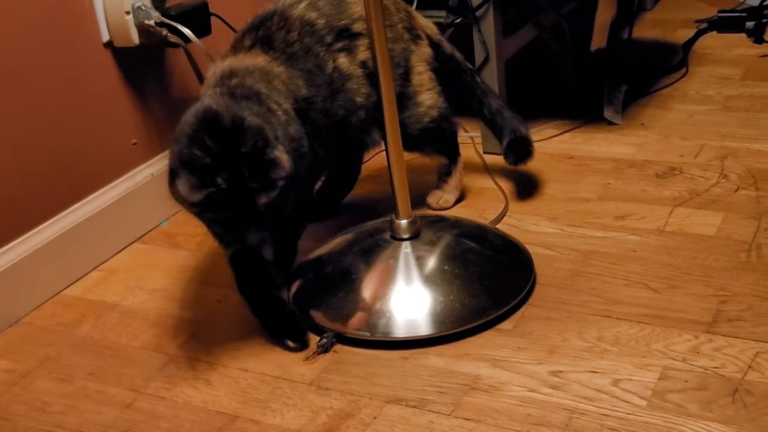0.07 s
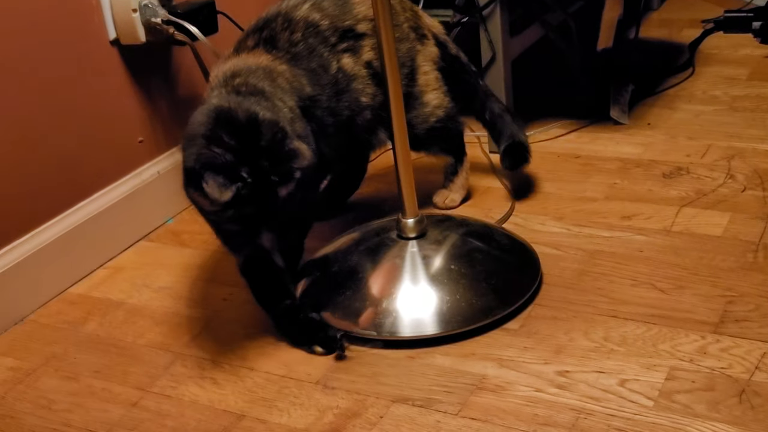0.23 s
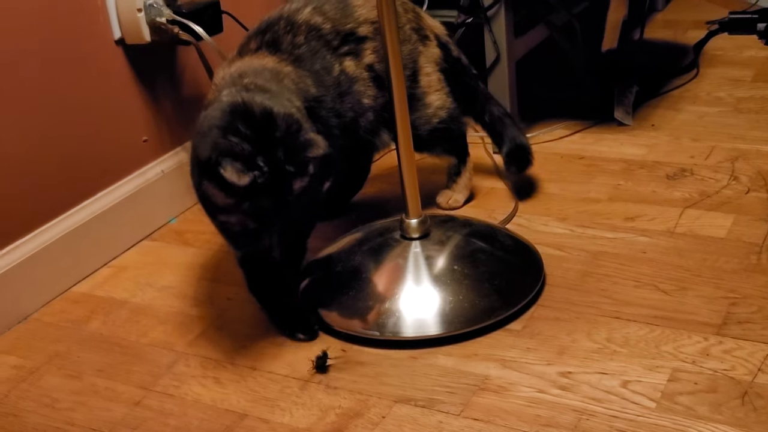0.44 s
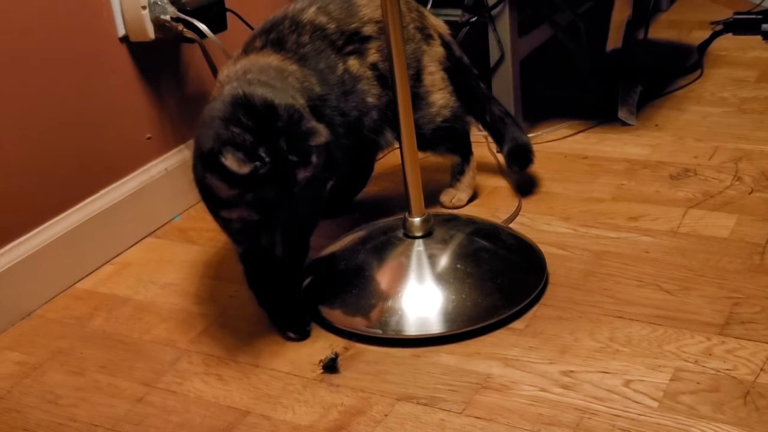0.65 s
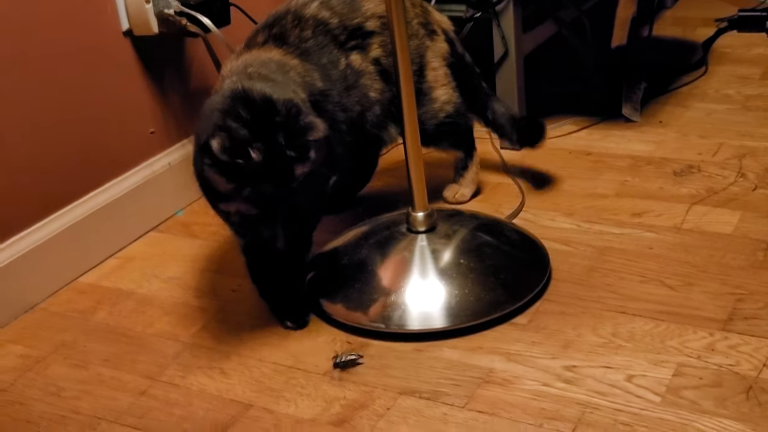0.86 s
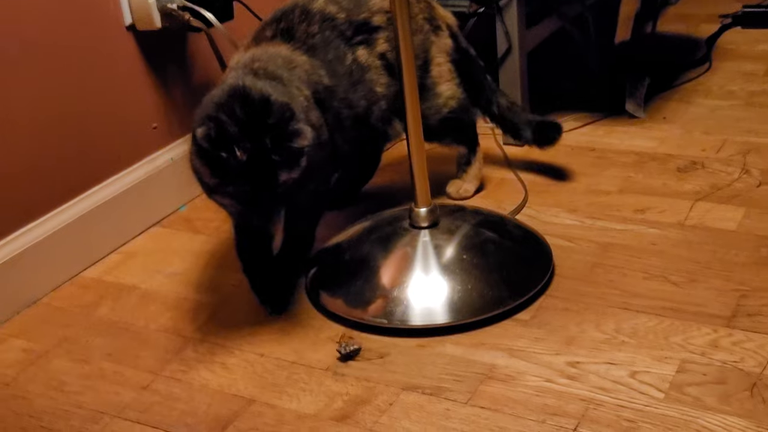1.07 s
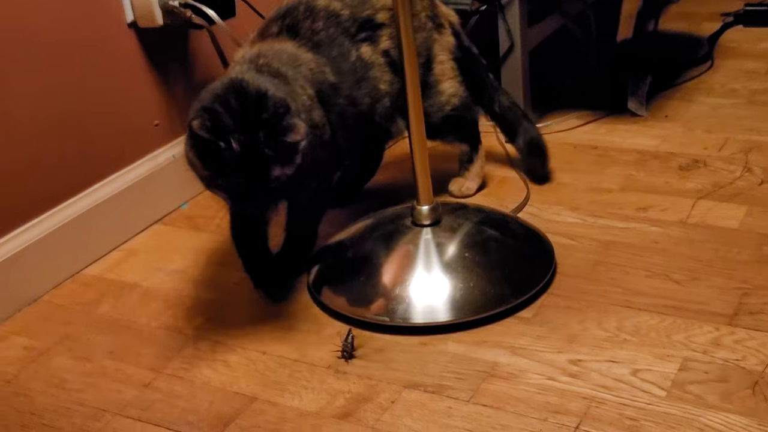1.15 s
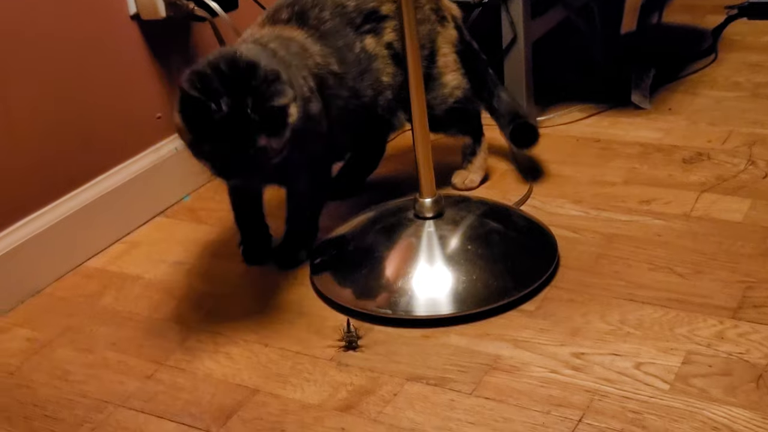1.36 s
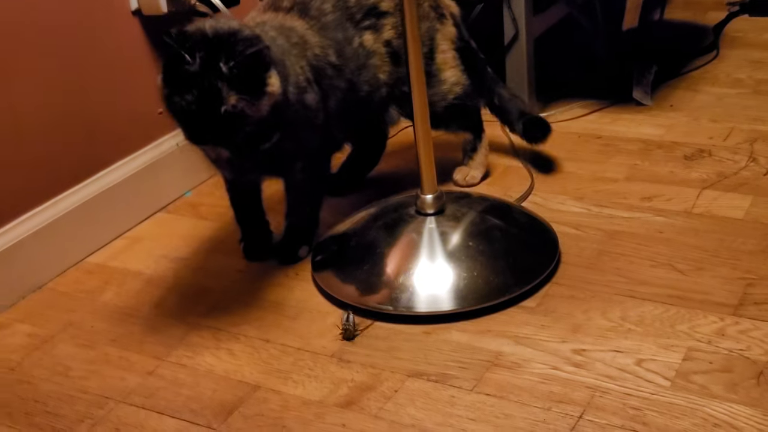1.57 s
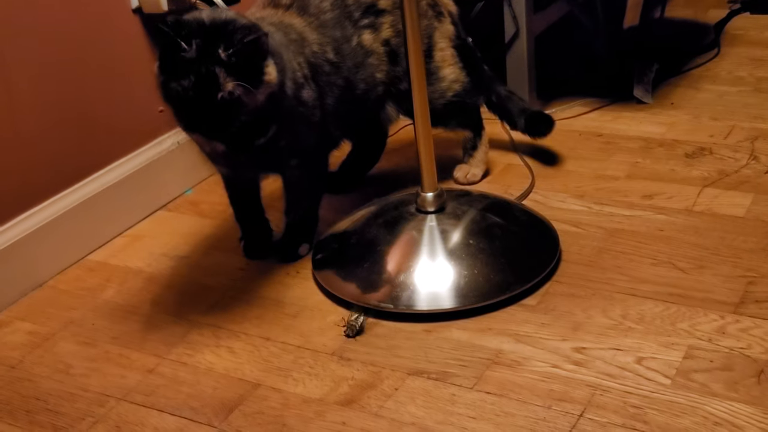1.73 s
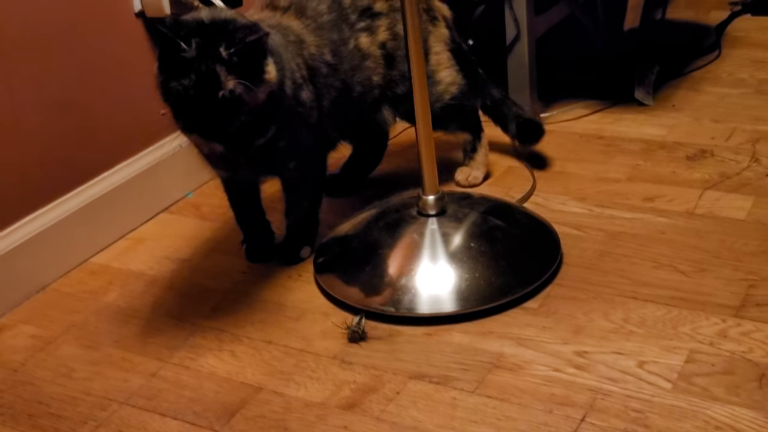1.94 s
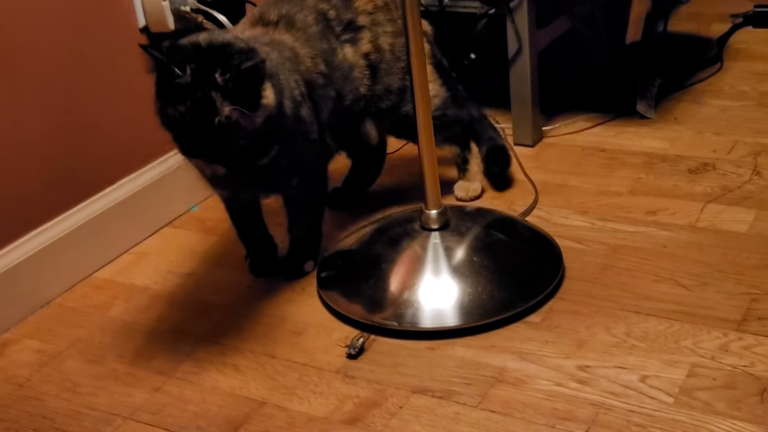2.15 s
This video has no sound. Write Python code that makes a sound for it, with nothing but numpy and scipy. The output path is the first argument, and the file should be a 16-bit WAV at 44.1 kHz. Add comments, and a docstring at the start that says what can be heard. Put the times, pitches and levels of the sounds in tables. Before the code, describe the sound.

A large insect's wings flutter in dry, crackling, clicking bursts against a wooden floor.

```python
"""In a quiet room, a cicada flounders on the wooden floor beside a metal lamp base, about a metre away.
Its stiff wings crinkle as tiny creases click, and they snap against the floor and bounce back.
A few knocks make the lamp base ring, and soft taps sound in the boards.
The room echoes briefly over a low rumble, mains hum and two dull thuds in the floor."""
import sys
import numpy as np
from scipy import signal
from scipy.fft import rfft, irfft
from scipy.io import wavfile
from scipy.ndimage import uniform_filter1d

SR = 44100
rng = np.random.default_rng(int(sys.argv[2]) if len(sys.argv) > 2 else 0)


def log_audio(samples):
    """Write samples as a 16-bit WAV file to the path given in sys.argv[1]."""
    # one column per channel
    frames = np.atleast_2d(samples).T
    # limit to full scale, then quantise
    limited = np.clip(frames, -1, 1)
    pcm = np.round(limited * 32767).astype(np.int16)
    wavfile.write(sys.argv[1], SR, pcm)


N = 97020


def undb(db):
    """Turn decibels into a gain to multiply by."""
    return 10 ** (np.asarray(db) / 20)


def unit(x):
    """Scale to an average power of 1."""
    return x / np.sqrt(np.mean(x ** 2) + 1e-20)


def curve(points, f):
    """Join (frequency, value) points into a line, with octaves evenly spaced."""
    p = np.array(points, float)
    return np.interp(np.log(f + 1), np.log(p[:, 0]), p[:, 1])


def freqs(size):
    """The frequencies in the spectrum of this many samples."""
    return np.arange(size // 2 + 1) * SR / size


def bump(f, hz, width_hz):
    """A rounded peak of height 1 around one frequency."""
    return 1 / (1 + (2 * (f - hz) / width_hz) ** 2)


def causal(gain):
    """A filter with these gains that rings only after a sound, never before it."""
    cepstrum = irfft(np.log(gain + 1e-5))
    half = len(cepstrum) // 2
    cepstrum[1:half] *= 2
    cepstrum[half + 1:] = 0
    return np.exp(rfft(cepstrum))


def add(out, start, x):
    """Mix x into out at a start time in seconds."""
    i = max(int(start * SR), 0)
    part = out[..., i:i + x.shape[-1]]
    part += x[..., :part.shape[-1]]


def swells(rows, taper):
    """A loudness outline that rises and falls once per row; taper is the share spent fading."""
    outline = np.zeros(N)
    for start, length, db in rows:
        add(outline, start, undb(db) * signal.windows.tukey(int(length * SR), taper))
    return outline


def noise_pair(size, unlike=.35):
    """Two partly alike noises, left and right."""
    shared, side = rng.standard_normal((2, size))
    return np.array([shared + unlike * side, shared - unlike * side])


def pan(db):
    """Left and right gains, with the left db decibels above the right."""
    return unit(undb(np.array([[db], [-db]]) / 2))


def background():
    """The room rumbles and hisses, the mains hum, and a faint swish fades at the start."""
    # colour of the room's steady noise: f/Hz, relative level/dB
    tone_colour = [(15, -13), (25, -9.5), (70, -1), (229, -4), (591, -14), (775, -11.5), (863, -20),
                   (1400, -20), (2160, -28.5), (2350, -28.5), (3430, -26.5), (4370, -29.5), (4740, -27),
                   (5140, -29.5), (16000, -50.5)]
    # tones of the mains hum: f/Hz, level/dB
    hum_tones = [(59.6,-71),(119.8,-67.5),(239.7,-71.5),(359.5,-72),(420,-69.5)]
    t, f = np.arange(N) / SR, freqs(N)
    mid, side, hiss = rfft(rng.standard_normal((3, N)))
    width = np.clip(f / 500, .3, 1)  # left and right are more alike below 500 Hz
    stereo = mid + np.array([[1], [-1]]) * width * side
    tone = unit(irfft(stereo * undb(curve(tone_colour, f))))
    hum = sum(undb(db) * np.sqrt(2) * np.sin(2 * np.pi * (hz * t + rng.random())) for hz, db in hum_tones)
    swish = unit(irfft(hiss * bump(f, hz=1520, width_hz=560)))
    swish *= np.clip((.22 - t) / .085, 0, 1)  # gone by 0.22 s
    return (undb(-54) * tone + hum + undb(-62) * swish) * pan(-1.06)


def floor_thuds():
    """Dull swells of rumble in the floor, probably a cat shifting its weight."""
    # thuds: t/s, level/dB, length/s
    thuds = [(.0,-57.5,0.14),(0.269,-52,0.063)]
    rumble = unit(irfft(rfft(rng.standard_normal(N)) * bump(freqs(N), hz=59, width_hz=45)))
    return rumble * swells([(start, length, db) for start, db, length in thuds], taper=.5)


def wing_crinkle(beat_hz=127.1, clicks_per_s=3000):
    """Tiny creases in the thin wing click in dense spells, bunched by the uneven wingbeat."""
    # spells of crinkling: t/s, length/s, relative level/dB
    spells = [(0.145,0.036,-54),(0.175,0.092,-36.5),(0.283,0.046,-37),(0.31,0.11,-40),(0.481,0.05,-48),(0.596,0.025,-31),(0.731,0.037,-41),(0.851,0.1,-40),(1.008,0.011,-46),(1.138,0.01,-33.5),(1.242,0.081,-36),(1.294,0.058,-36.5),(1.476,0.056,-49.5),(1.523,0.026,-42.5),(1.544,0.063,-33.5),(1.683,.015,-51),(1.7,0.074,-52),(1.768,0.047,-44),(1.85,0.14,-47.5),(2.002,0.051,-49),(2.105,0.05,-53.5)]
    # colour of the crinkle: f/Hz, relative level/dB
    colour = [(300,-86),(900,-7),(1500,-9.5),(2600,-3.5),(4000,-10.5),(6500,0),(8500,-16.5),(11000,0),(14000,5),(16000,-2)]
    wander = unit(uniform_filter1d(rng.standard_normal(N), size=900))
    cycles = np.cumsum(beat_hz * (1 + .175 * wander)) / SR
    beat = 1 + .1 * np.sin(2 * np.pi * cycles)
    click_db = 3 * np.minimum(rng.exponential(size=N), 3)
    clicks = (rng.random(N) < clicks_per_s / SR) * undb(click_db)
    spectrum = rfft(noise_pair(N) * clicks * beat) * causal(undb(curve(colour, freqs(N))))
    return unit(irfft(spectrum)) * swells(spells, taper=.7) * undb(-2.5) * pan(-2.5)


def wing_strikes(size=2048, bend=.053):
    """The wing hits the floor and rings. Returns the direct sound and a smoother one to fill the room."""
    # wing hits: t/s, relative treble level/dB, middle over treble/dB, bass over treble before a lift/dB,
    # left minus right/dB, bounce delay/s, bounce over snap/dB
    hits = [(0.2031, -27, -1, -16.5, -7.5, 0.0024, -8), (0.2226, -34, -9.0, -16, 7, 0.0039, -10),
            (0.2277, -28.5, -6.5, -10, -7, 0.0016, 5.5), (0.2633, -38.5, -1, -15.0, -4, 0.0011, -2),
            (0.2697, -39.5, -2, -7.5, -9, 0.0015, -2.0), (0.3095, -29.0, -4.5, -6.5, -5, 0.0024, -14),
            (0.3121, -34, -7, -9.5, -16, 0.0029, -4.0), (0.3355, -25, 0.5, -7.5, -5.5, 0.0021, -4.5),
            (0.3638, -39.5, -1, -1, -6, 0.0011, -8), (0.3921, -41, -11, -19, 9, 0.0013, -9),
            (0.4045, -34, -12, -11.5, 8, 0.0019, 0), (0.4067, -27, -9.0, -10.5, -14, 0.0013, 0),
            (0.499, -50.5, 5.5, -15, -19, 0.004, -13), (0.5063, -38, -3, -8.0, -7.5, 0.0011, -5),
            (0.5919, -43, -3.5, -9, -3, 0.00085, -1.0), (0.6057, -24, -10, -12, -2, 0.0015, 11),
            (0.7234, -38.0, -0.5, -12.5, -4, 0.0014, -2), (0.8033, -51, -7, -13.0, -10, 0.00096, -1),
            (0.8737, -27.5, -9.5, -18.5, -2.5, 0.0034, -1.5), (0.9118, -34, -0.5, -11.5, -5, 0.0024, 0),
            (0.9583, -31.5, -5, -10, -5, 0.00053, -17), (1.0008, -41.5, -0.5, -4.5, -2.0, 0.00077, -3),
            (1.0152, -41.5, 1, -7.5, -2, 0.0016, -15), (1.1109, -36.5, -8, -12.5, -8, 0.0011, -11),
            (1.148, -21, -9.5, -17.5, -3.5, 0.0035, -3.5), (1.2605, -28.0, -8.0, -12.5, -8, 0.004, -19),
            (1.2894, -20.5, -9.5, -19.5, -3.0, 0.0019, 2.5), (1.4992, -47, -23, -25, 1, 0.0014, -6),
            (1.5441, -34.5, -7.0, -16, -5, 0.002, 3), (1.5606, -45.5, 1, -6, 11, 0.00091, 6),
            (1.5679, -39.5, 4.5, -7.5, -6.5, 0.0014, -3), (1.5752, -34, -7, -12.5, 1.5, 0.0012, 5),
            (1.5906, -36.5, -13.0, -22.0, -1, 0.0017, -3), (1.7849, -33.5, -5.5, -15, -6.0, 0.0015, 0.5),
            (1.7895, -37, -7, -22.0, -3.0, 0.00045, -3), (1.823, -40.5, -6.0, -10, -5, 0.0011, -3),
            (1.8656, -41.0, -9.0, -15, -5.5, 0.0027, 3), (1.8851, -45, -13.0, -10, -11, 0.0014, 5),
            (1.898, -46, -6, -18.0, -7, 0.0015, -3), (1.918, -50, -14, -10, -6.0, 0.0022, -4.0),
            (1.9333, -54, 1, -17, 1, 0.00058, -8), (1.9415, -38, -8.5, -12.5, -5.0, 0.0007, -11),
            (1.9764, -51.5, -2.0, -17, -11, 0.00068, -3.0), (2.0643, -44.0, -13, -21, -1, 0.0023, -19),
            (2.067, -47, -9, -24.0, -10, 0.0023, -3), (2.09, -52, -7, -11, -6, 0.0023, 0.0),
            (2.1212, -54.5, -6, -22, -12, 0.003, -9), (2.1353, -57, -15, -20, -4.0, 0.001, -6)]
    # pitches at which the wing rings: f/Hz, width/Hz, height/dB
    resonances = [(1450,280,13),(2213,130,9),(3820,1630,-1.5),(4410,200,5),(6160,430,2.5),(11240,810,20.5),(13020,1140,24),(14250,1100,16.5)]
    lead_s, span_s = .004, .005  # time before the snap; time over which a hit's level is averaged
    gain_db, bass_lift_db, room_db = .5, 3, 2
    direct, spread = np.zeros((2, N)), np.zeros(N)
    t, f = np.arange(size) / SR - lead_s, freqs(size)
    bass, below_treble = (1 / (1 + (f / hz) ** 12) for hz in (3130, 7410))
    bands = np.array([1 - below_treble, below_treble - bass, bass]).clip(0)
    thin = f ** 2 / (f ** 2 + 670 ** 2)  # a small wing gives off little below 670 Hz

    def fade(age, decay_s):
        """Start at age zero and die away."""
        return (age >= 0) * np.exp(-abs(age) / decay_s)

    def balance(spectrum, db):
        """Turn a spectrum into sound with these treble, middle and bass levels."""
        power = 2 * bands @ abs(spectrum) ** 2 / (size * span_s * SR)
        return irfft(spectrum * causal((undb(db) / np.sqrt(power)) @ bands))

    for start, db, middle_db, bass_db, pan_db, bounce_s, bounce_db in hits:
        bends = 1 + bend * rng.standard_normal(len(resonances))  # the wing bends differently each time
        peaks = sum(undb(peak_db) * bump(f, hz * shift, width)
                    for (hz, width, peak_db), shift in zip(resonances, bends))
        lead_in = undb(-23) * fade(-t, .001)  # a faint, brief swell softens the start of the snap
        snap = fade(t, .0005)
        bounce = undb(bounce_db) * fade(t - bounce_s, .0007)
        scatter = undb(-15) * fade(t, .0022)
        burst = noise_pair(size) * (lead_in + snap + bounce + scatter)
        ringing = rfft(burst) * causal((1 + peaks) * thin)
        levels = gain_db + db + np.array([0, middle_db, bass_db + bass_lift_db])
        add(direct, start - lead_s, np.array([balance(side, levels) for side in ringing]) * pan(pan_db))
        all_directions = causal((1 + peaks) ** .25 * thin)  # summed all round, the peaks flatten
        add(spread, start, balance(all_directions, levels + room_db))
    return direct, spread


def lamp_base():
    """The metal base rings briefly when the insect knocks on it."""
    # knocks: t/s, level/dB
    knocks = [(.203,-42),(.336,-49),(1.290,-46),(1.568,-51)]
    # tones of the metal: f/Hz, relative level/dB, time to fade by 60 dB/s
    tones = [(3780,0,0.19),(3860,3.5,0.18),(4370,2,.15)]
    out, t = np.zeros((2, N)), np.arange(SR // 3) / SR
    for start, knock_db in knocks:
        for hz, db, t60 in tones:
            ring = np.sin(2 * np.pi * (hz * t + rng.random((2, 1))))
            add(out, start, undb(knock_db + db) * ring * np.exp(-np.log(1000) * t / t60))
    return out


def floor_taps(rise_s=.00075, gain_db=4.5):
    """A soft touch rings a floorboard for two or three cycles."""
    # taps on the boards: t/s, relative level/dB, f/Hz
    taps = [(.337,-51,646),(.392,-50,650),(.527,-51.5,630),(.537,-53,700),(.592,-52,580),(.607,-56,794),(.724,-52.5,720),(.868,-49.5,640),(1.056,-56,694),(1.066,-52.5,640),(1.126,-46,680),(1.140,-51,650),(1.476,-52,710),(1.533,-44,707),(1.717,-56.5,700),(1.848,-56,680),(1.888,-49,735),(2.008,-53,660)]
    out, t = np.zeros(N), np.arange(SR // 40) / SR
    outline = 2 * t / rise_s * np.exp(1 - t / rise_s)
    for start, db, hz in taps:
        add(out, start, undb(db + gain_db) * outline * np.sin(2 * np.pi * hz * t))
    return out


def floor_reflection(x):
    """Sound bouncing off the floor partly cancels a few narrow bands of the wing's sound."""
    # dips: f/Hz, width/Hz, level/dB
    dips = [(990,156,-7),(1840,200,-1),(2777,223,-5.5)]
    dip_db = sum(db * bump(freqs(N), hz, width) for hz, width, db in dips)
    return irfft(rfft(x) * causal(undb(dip_db)))


def microphones(x, lag_s=.0002803):
    """The right microphone hears the insect a little later and with another colour."""
    # colour between the two sides: f/Hz, left minus right/dB
    left_over_right = [(500,4),(1600,4),(3000,8.5),(4800,9),(6500,-7),(8200,19),(10300,-45.5),(11500,-4),(13500,5),(16000,-12.5)]
    f = freqs(N)
    tilt = undb(curve(left_over_right, f))
    even_power = np.sqrt(2 / (1 + tilt ** 2))
    left = causal(tilt * even_power)
    right = causal(even_power) * np.exp(-2j * np.pi * f * lag_s)
    return irfft(rfft(x) * np.array([left, right]))


def room_echo(x, size=32768, delay_s=.002, build_s=.0027, early_s=.006):
    """Quick reflections off floor and lamp base, then a tail that dies sooner in the treble."""
    # bands of the echo's tail: f/Hz, level/dB
    bands = [(500,-14),(1400,-11.5),(2600,-10.5),(3900,-8),(5200,-11.5),(6800,-13),(8500,-13),(12000,-12),(15500,-18)]
    t, f = np.arange(size) / SR, freqs(size)
    noise, tail = rfft(rng.standard_normal((2, size))), 0
    build = 1 - np.exp(-np.maximum(t - delay_s, 0) / build_s)
    for hz, db in bands:
        band = curve([(centre, centre == hz) for centre, _ in bands], f)
        t60 = .45 / (1 + (hz / 23000) ** 2)  # seconds to fade by 60 dB
        tail += undb(db) * irfft(noise * band) * unit(build * np.exp(-np.log(1000) * t / t60))
    early = unit(rng.standard_normal((2, size)) * (t > delay_s) * np.exp(-t / early_s))
    echo = (tail + undb(-12) * early) / np.sqrt(size)
    return signal.fftconvolve(x[None], echo, axes=1)[:, :N]


def scene():
    """Wings and taps, heard directly and as echo, join the lamp base, background and thuds."""
    snaps, spread = wing_strikes()
    crinkle, taps = wing_crinkle(), floor_taps()
    direct = microphones(floor_reflection(snaps + crinkle) + taps)
    echo = room_echo(floor_reflection(spread + crinkle.mean(0)) + 2 * undb(1.5) * taps)
    return direct + lamp_base() + echo + background() + floor_thuds()


def record(dry, top_hz=16100):
    """A steep filter cuts off the highest treble."""
    return signal.sosfilt(signal.ellip(8, .2, 70, top_hz, fs=SR, output="sos"), dry)


dry = scene()
out = record(dry)
log_audio(out)
```